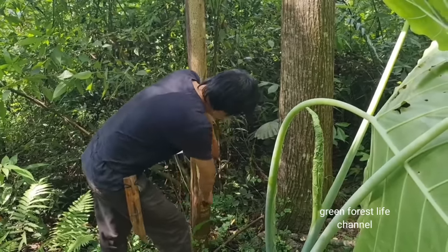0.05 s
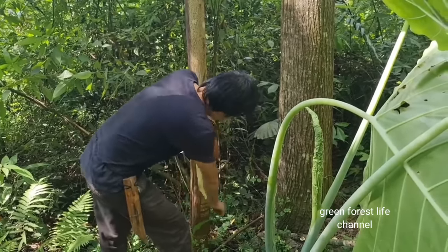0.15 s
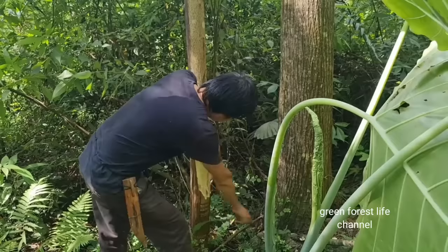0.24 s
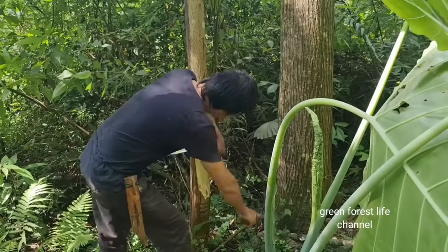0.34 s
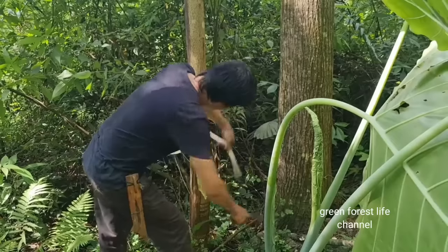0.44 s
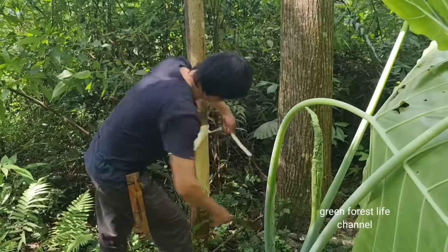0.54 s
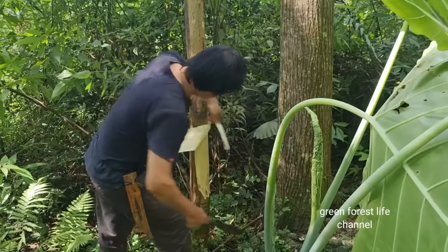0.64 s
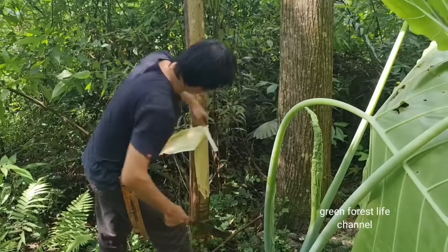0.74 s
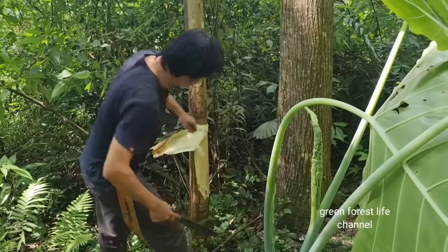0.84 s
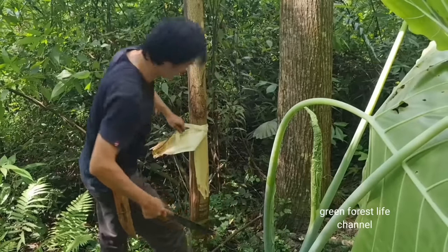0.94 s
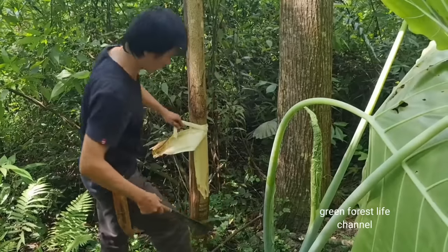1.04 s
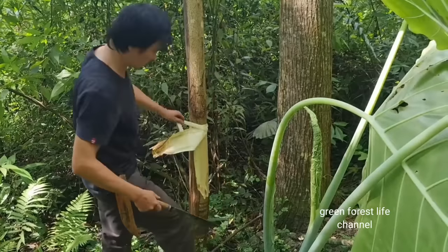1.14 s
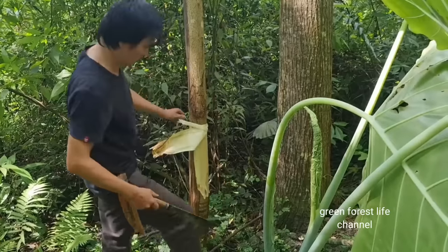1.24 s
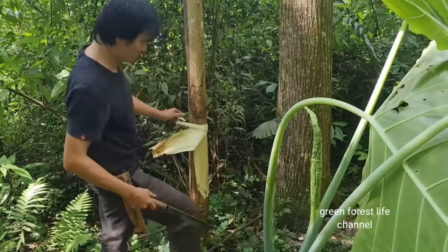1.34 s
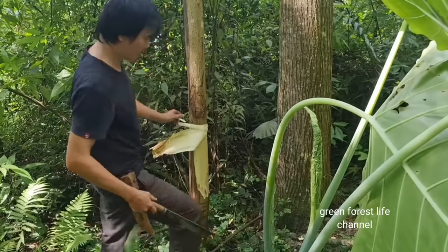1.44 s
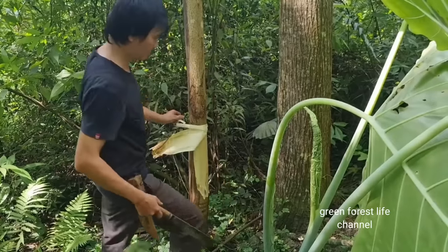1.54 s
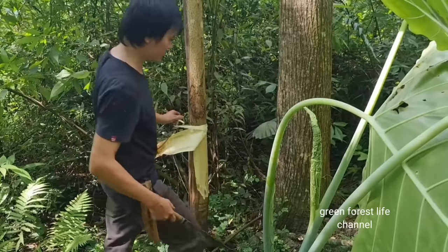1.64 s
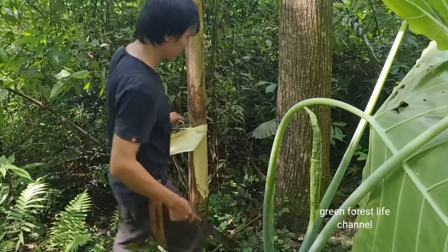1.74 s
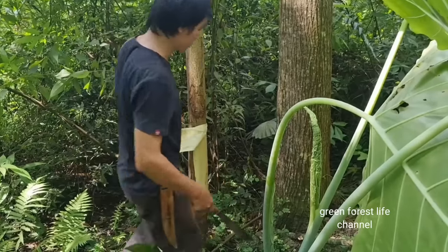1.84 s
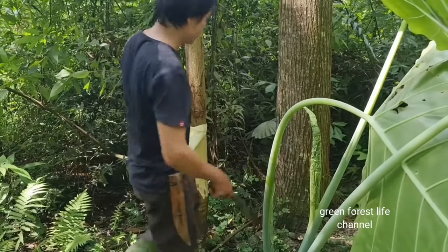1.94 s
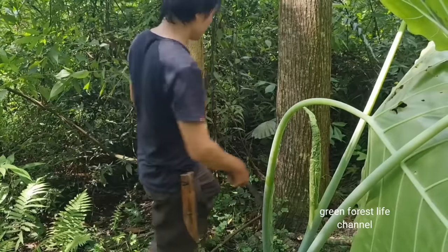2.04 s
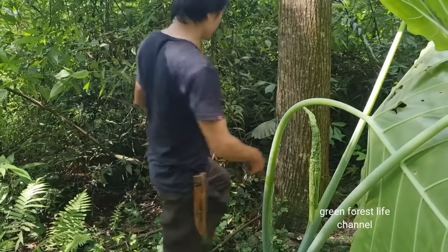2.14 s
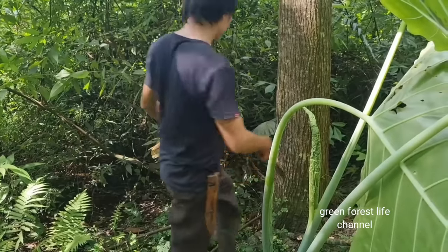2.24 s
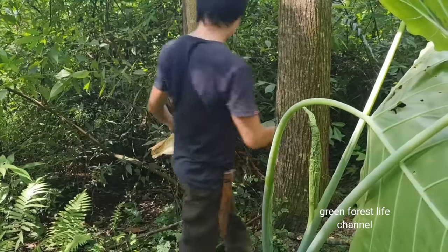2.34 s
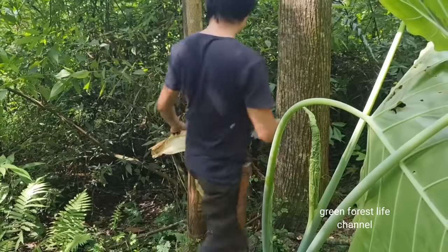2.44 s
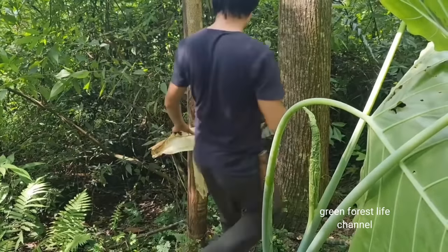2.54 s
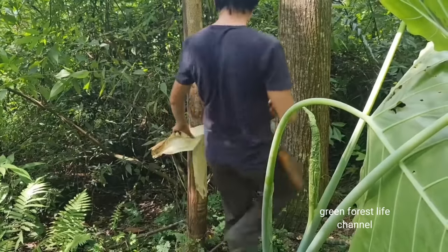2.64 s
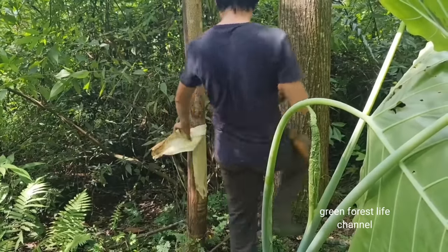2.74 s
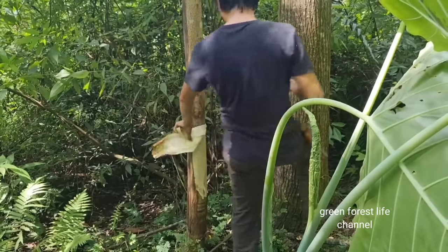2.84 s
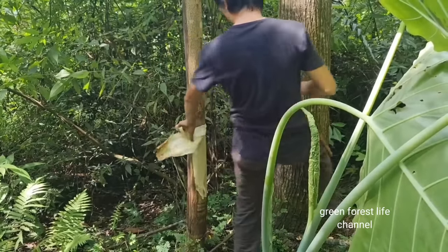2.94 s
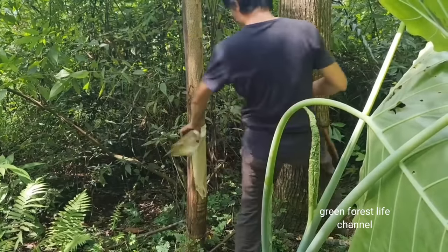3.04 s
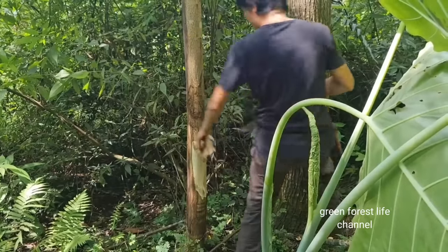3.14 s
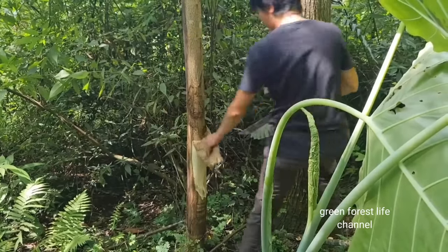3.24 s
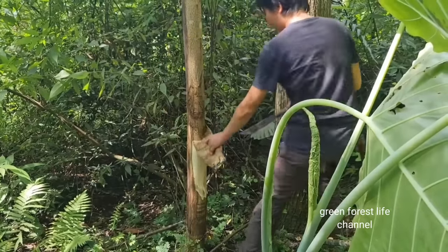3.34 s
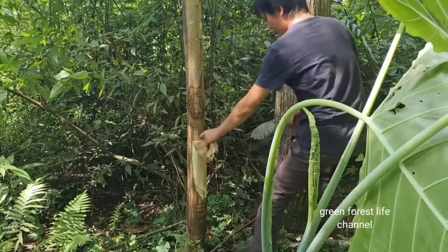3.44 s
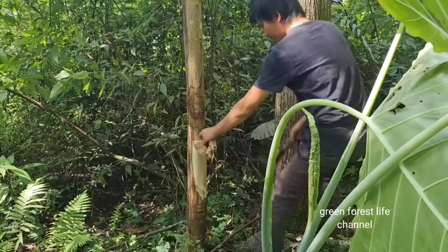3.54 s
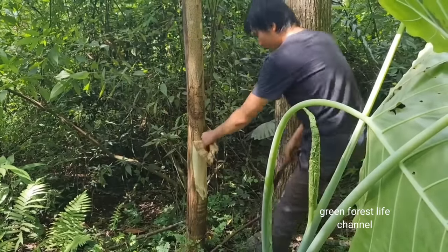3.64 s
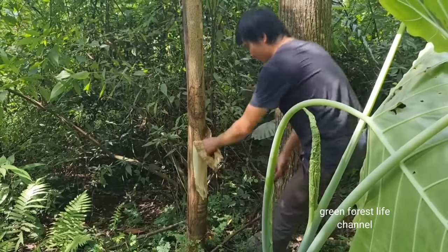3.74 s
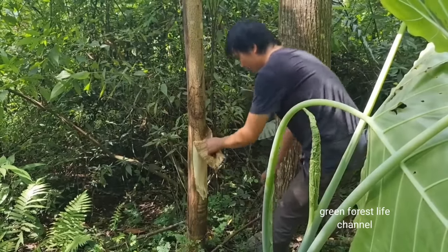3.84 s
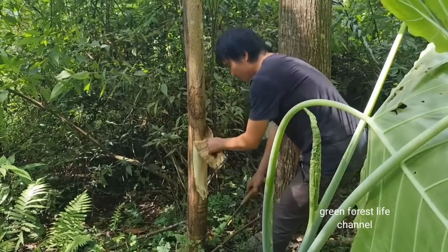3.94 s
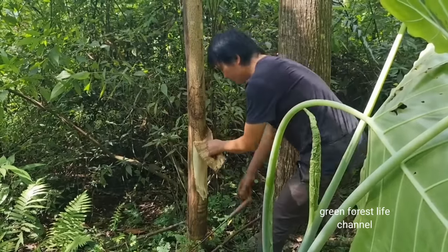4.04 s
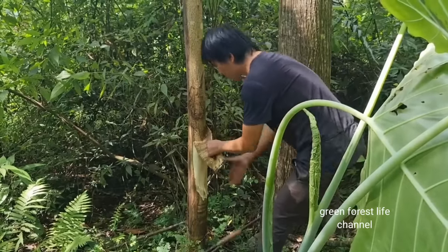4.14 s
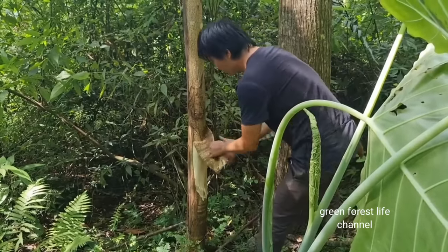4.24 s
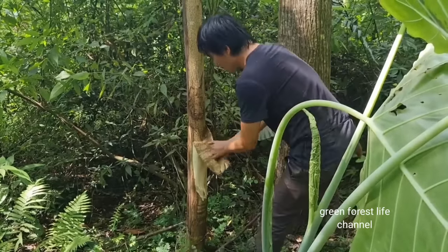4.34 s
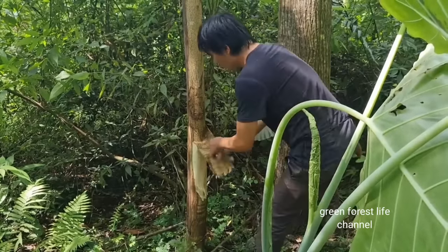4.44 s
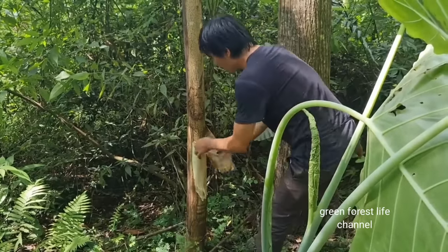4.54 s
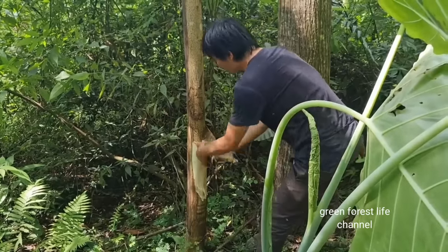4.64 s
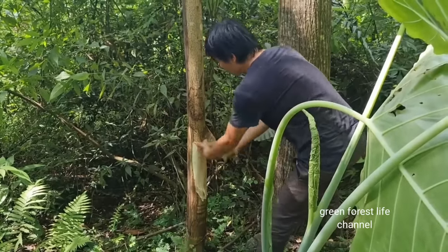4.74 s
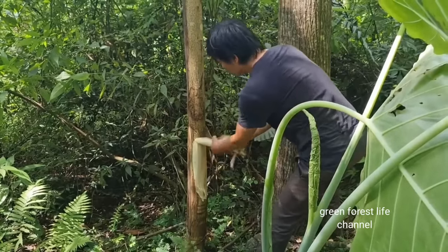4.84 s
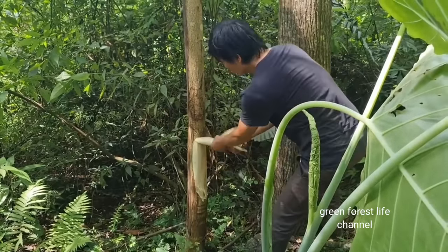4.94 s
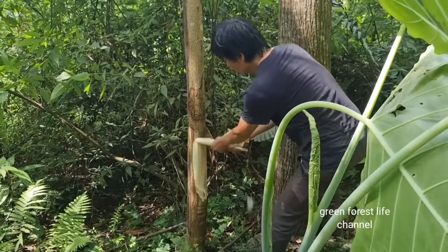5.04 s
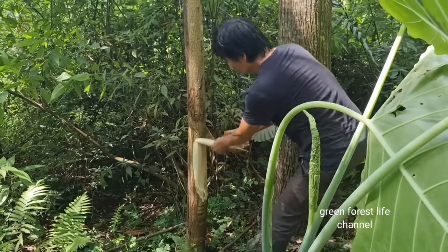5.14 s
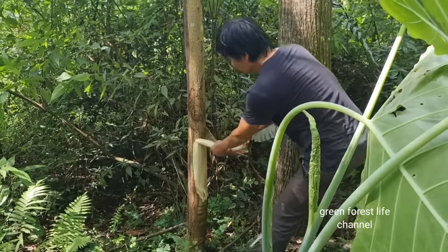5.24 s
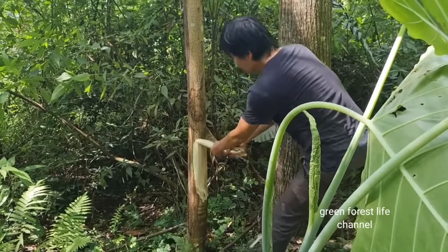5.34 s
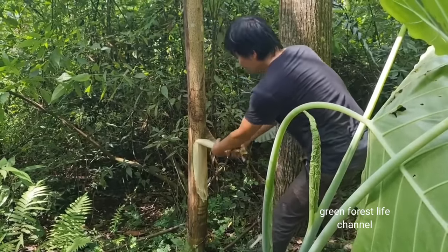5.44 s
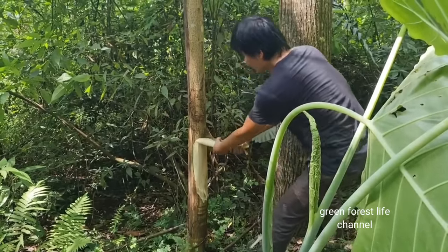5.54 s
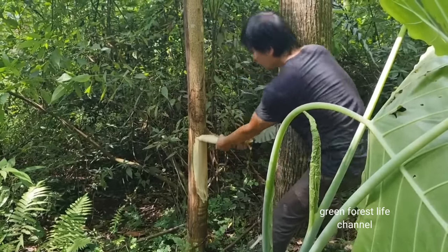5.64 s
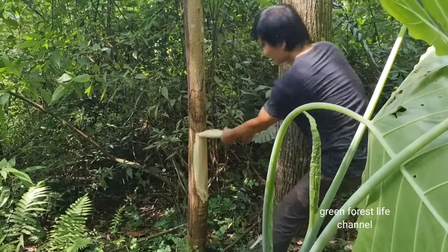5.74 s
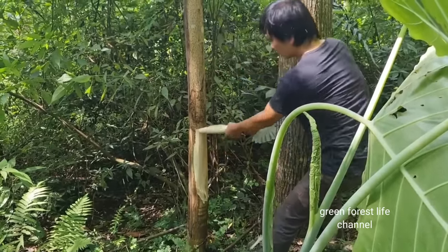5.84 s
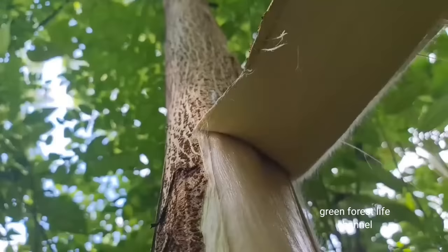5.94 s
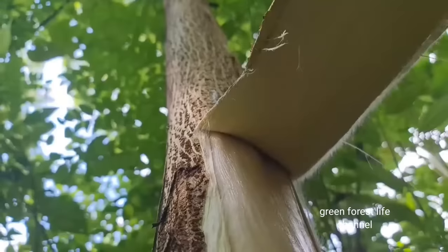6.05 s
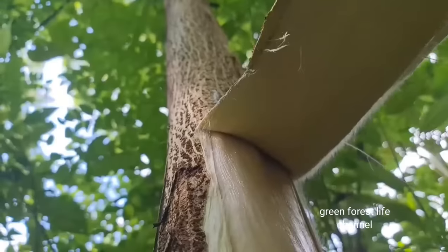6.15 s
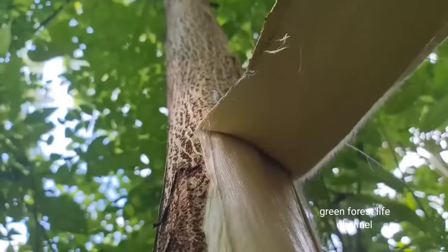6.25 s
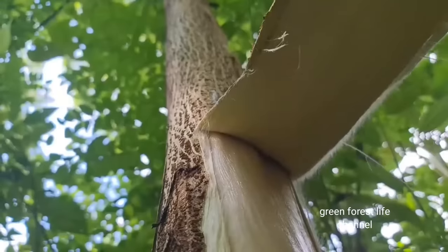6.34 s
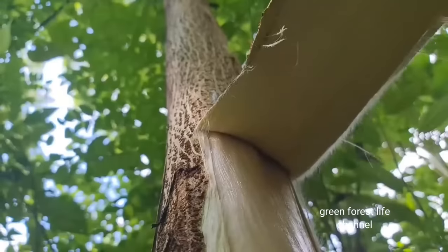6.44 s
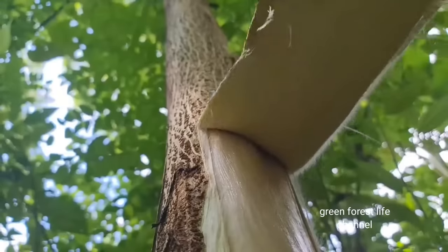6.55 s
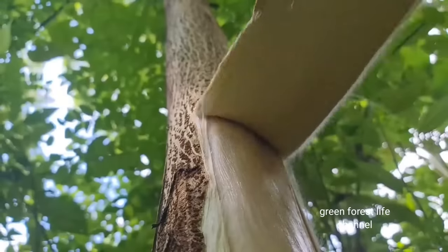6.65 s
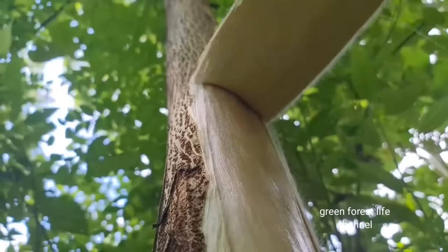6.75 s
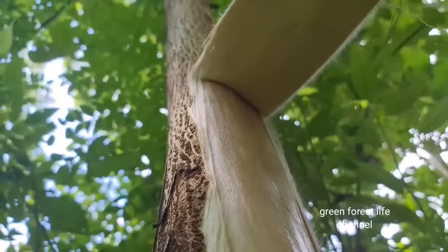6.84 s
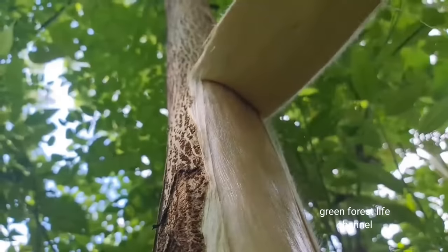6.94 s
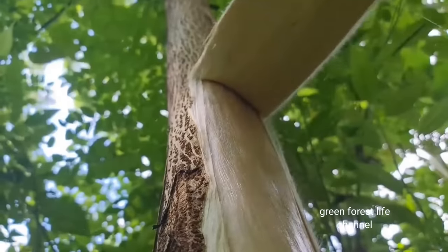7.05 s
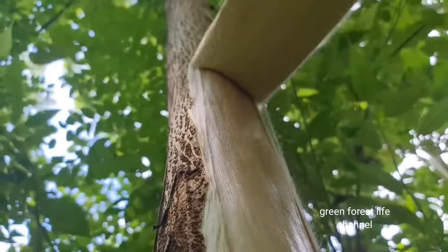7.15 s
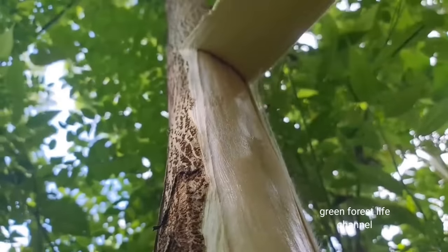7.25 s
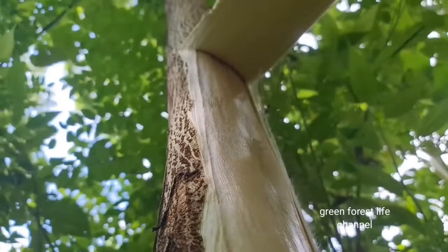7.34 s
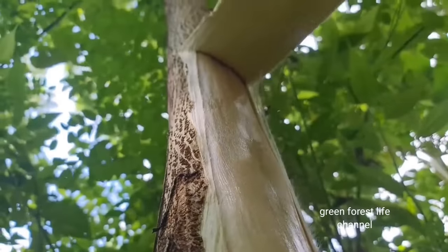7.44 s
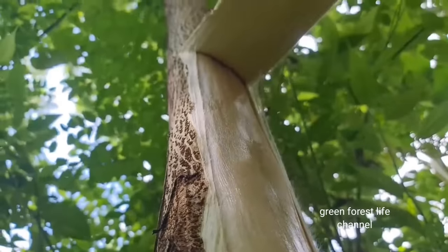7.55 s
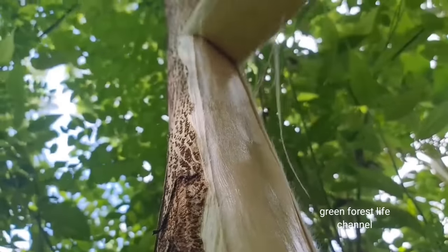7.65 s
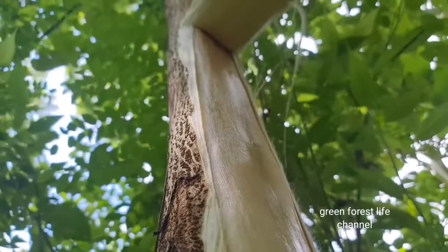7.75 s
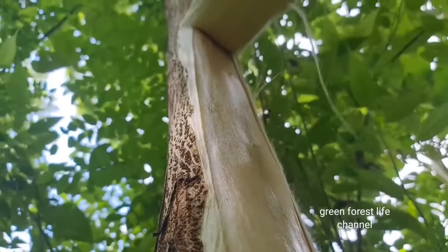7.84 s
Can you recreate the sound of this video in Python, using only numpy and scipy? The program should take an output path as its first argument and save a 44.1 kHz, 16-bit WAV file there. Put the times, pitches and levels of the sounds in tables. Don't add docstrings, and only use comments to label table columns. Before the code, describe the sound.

Sharp bark cracks and a blade knock on a trunk, leaf-litter footsteps, then long wet ripping pulls of bark in a quiet insect-filled forest.

```python
import sys
import numpy as np
from scipy import signal
from scipy.io import wavfile
from scipy.ndimage import uniform_filter1d

SR = 44100
rng = np.random.default_rng(int(sys.argv[2]) if len(sys.argv) > 2 else 0)


def inscribe(sig):
    pcm = np.round(np.clip(np.atleast_2d(sig).T, -1, 1) * 32767)
    wavfile.write(sys.argv[1], SR, pcm.astype(np.int16))


def linear_from_db(decibels):
    return 10 ** (np.asarray(decibels, float) / 20)


N = 347508

# (frequency [Hz], density [dB per Hz])
FOREST_SPECTRUM = [(110, -29.5), (180, -7), (620, -1.5), (2100, -8.5), (4200, -13.5), (8700, -15),
                   (9300, -24), (15500, -21)]
# (time [s], level [dB])
FOREST_LEVEL = [(0, -64.5), (.3, -75.5), (.6, -75), (1.3, -72), (2.5, -65.5), (4.2, -68), (4.7, -73.5),
                (5.6, -72), (6.2, -67), (7.88, -67)]
# (frequency [Hz], left-right likeness [-1..1])
FOREST_LIKENESS = [(60, 0.68), (240, -0.8), (950, -0.58), (3770, 0.0075), (15000, -0.23)]
# (centre [Hz], half width [Hz], level [dB rms])
INSECTS = [
    (4950, 300, -61.5),
    (8300, 200, -79),
]
# (frequency [Hz], density [dB per Hz])
RUMBLE_SPECTRUM = [(12, -59.5), (20, -30), (32, -18.5), (54, 5), (72, 6), (96, -5), (140, -8), (180, -35.5)]
# (time [s], level [dB])
RUMBLE_LEVEL = [(0, -62.5), (.26, -56.5), (.37, -69.5), (1.68, -62.5), (1.8, -47), (1.9, -63), (2.2, -58),
                (2.85, -55), (3.15, -55.5), (4.04, -52), (4.85, -63), (6.08, -59.5), (6.3, -53),
                (6.87, -46), (7.03, -50), (7.28, -46.5), (7.7, -49), (7.88, -64)]

# (frequency [Hz], density [dB per Hz])
LITTER_SPECTRUM = [(88, -30.5), (190, 9), (396, 12), (844, -3), (1370, -5), (2230, -9.5), (2980, -7.5),
                   (5870, -9.5), (15500, -18.5)]
# (frequency [Hz], left-right likeness [-1..1])
LITTER_LIKENESS = [(300, 0.94), (1500, 0.13), (9000, 0.088)]
# (time [s], level [dB])
STIRRING = [(0, -56.5), (.3, -74), (.46, -67.5), (.7, -68.5), (1.3, -65), (1.58, -56), (2.24, -60.5),
            (2.6, -60), (3.0, -69), (3.45, -51), (4.1, -57), (4.24, -59.5), (4.61, -66.5), (4.89, -63),
            (5.48, -64), (6.1, -69), (6.9, -56), (7.88, -66)]
# (middle [s], level [dB rms], rise [s], fall [s], treble [dB])
CRUNCHES = [(0.375, -53.5, 0.0086, 0.015, 6), (1.42, -52, 0.07, 0.045, -10.5),
            (1.749, -36.5, 0.021, 0.013, -12), (1.81, -48.5, 0.041, 0.019, -6.5),
            (2.23, -50.5, 0.013, 0.073, -18.5), (2.38, -35.5, 0.011, 0.026, -13),
            (2.46, -35.5, 0.026, 0.028, -7), (2.63, -48.5, 0.052, 0.03, -8.5),
            (3.179, -36.5, 0.0067, 0.022, -7.5), (3.373, -41.5, 0.0092, 0.02, -2.5),
            (3.61, -47, 0.026, 0.054, -10), (3.783, -40, 0.008, 0.022, -3), (3.762, -46, .015, .02, -9),
            (4.38, -67.5, .01, 0.061, -1.5), (3.95, -55, .004, 0.012, 5),
            (4.034, -47.5, 0.011, 0.033, -6.5), (5.121, -55, 0.0074, 0.043, -15),
            (6.31, -45.5, 0.059, 0.047, -7), (6.389, -52, 0.015, 0.004, 1), (6.97, -57, .06, .2, 1),
            (7.44, -53, .05, .2, -1), (7.58, -50, .07, .05, 0)]
# (middle [s], level [dB rms], rise [s], fall [s], bass [dB])
SHAKES = [
    (.215, -35, 0.064, 0.027, -19.5),
    (.14, -50, .07, .05, -22.5),
    (.385, -43, 0.017, 0.018, -32.5),
    (2.47, -58, 0.27, 0.015, -1.5),
    (3.18, -64, 0.14, 0.046, 5),
    (4.37, -34, 0.033, 0.043, -15),
    (5.75, -58, 0.097, .06, -13),
    (6.38, -51, 0.11, 0.52, -8.5),
    (7.57, -42.5, 0.13, 0.088, -7.5),
]

# (start [s], length [s], pitch [Hz], level [dB rms])
CREAKS = [(.085, .06, 2700, -53), (.22, .08, 2700, -49), (.29, .06, 2750, -58), (.62, .06, 2100, -68),
          (4.05, .25, 490, -59), (4.2, .12, 635, -62), (3.58, .07, 740, -51), (6.3, .1, 1450, -51),
          (6.37, .08, 1900, -52), (6.43, .08, 1500, -51), (6.4, .1, 1150, -54), (6.0, .08, 880, -49),
          (7.07, .05, 370, -51), (3.57, .09, 320, -51), (5.095, .05, 900, -56), (7.53, .08, 330, -48),
          (7.73, .07, 290, -47)]
# (time [s], peak [dB], ring [Hz], treble [dB], crack length [s])
CRACKS = [(.1452, -19, 2500, -34, .016), (.1445, -23, 4000, -34, .012), (.1533, -20, 1600, -32, .012),
          (.1682, -9, 2700, -34, .014), (.1678, -16, 5200, -36, .012), (.1685, -13, 1500, -40, .014),
          (.175, -22, 2800, -30, .03), (.2185, -19, 1900, -40, .012), (.236, -26, 2700, -28, .015),
          (.2113, -6, 1750, -40, .022), (.2101, -1, 4400, -32, .016), (.2101, -9, 5800, -38, .012),
          (.215, -18, 5000, -34, .06), (.2112, -11, 2700, -40, .025), (.2115, -15, 1300, -45, .014),
          (2.293, -27, 1700, -38, .016), (2.2945, -25, 800, -45, .022), (4.329, -9, 1200, -42, .012),
          (4.329, -12, 2200, -30, .008), (4.33, -25, 3300, -26, .06), (4.3315, -9, 1800, -44, .008),
          (4.3335, -11, 1500, -44, .01), (4.336, -17, 1400, -38, .03), (4.347, -20, 1500, -30, .04),
          (4.3625, -2, 3100, -38, .03), (4.3585, -18, 2600, -28, .03), (4.3585, -24, 11500, -40, .07),
          (4.359, -17, 5500, -28, .03), (4.349, -24, 3600, -26, .04), (4.362, -24, 12000, -40, .05),
          (4.342, -38, 11000, -40, .1), (4.345, -36, 15000, -50, .15), (4.372, -28, 3200, -60, .36),
          (4.372, -15, 3000, -40, .02), (4.368, -19, 5200, -45, .07), (4.331, -29, 6000, -26, .14),
          (4.362, -12, 850, -45, .03), (4.363, -9, 5300, -45, .03), (4.369, -11, 1900, -45, .025),
          (4.59, -42, 1050, -40, .03)]
# (time [s], peak [dB], ring [Hz], left-right [dB])
BRITTLE = [(.1535, -27, 2800, 0), (.146, -26, 1500, 0), (1.541, -33.5, 5540, 6), (1.74, -39, 3820, 8),
           (2.442, -27, 1400, 0), (2.4503, -18, 3600, 3), (2.488, -16.5, 3050, 1), (2.4885, -22, 6500, 2.5),
           (2.4965, -17, 4500, -0.5), (2.511, -30, 3980, 0), (3.369, -33, 5470, 4),
           (3.369, -32.5, 2370, 5.5), (3.587, -29, 3200, 1), (3.777, -25, 7800, 1), (3.946, -40.5, 3005, 2),
           (3.9545, -30, 3950, 2), (3.8805, -42, 5160, 0.5), (3.9074, -41, 2300, 0.5),
           (6.297, -34, 3220, -6), (2.566, -45, 2940, 0.5), (.372, -36, 4500, 0), (4.032, -23, 5600, 0),
           (4.151, -39.5, 5040, 5), (5.752, -30.5, 1900, 4), (5.989, -27.5, 1610, 2),
           (6.313, -25, 3600, -5), (4.08, -39.5, 7000, 2)]
# (time [s], peak [dB], ring [Hz], left-right [dB])
DAMP = [(.359, -36.5, 2640, -0.5), (0.364, -28, 2520, -1), (.367, -29.5, 1720, -2), (.369, -30, 3270, 2),
        (.379, -36, 2400, 2), (1.439, -40, 3500, 5.5), (1.821, -30, 4440, 1), (2.292, -21, 1050, -1),
        (2.38, -24, 1130, 0.5), (3.053, -42, 950, -1), (3.090, -35, 1320, -6), (3.096, -31, 900, -1),
        (3.100, -32, 1120, 3.5), (3.116, -37, 990, -6), (3.165, -32.5, 990, -6), (3.173, -26, 1100, -4),
        (3.184, -32, 900, -4), (3.091, -36, 1900, 0), (3.176, -33, 600, -5), (3.174, -32, 1700, -3),
        (3.097, -41, 600, 0), (3.210, -30.5, 850, -12), (3.243, -43, 1010, 1.5), (3.291, -42, 1080, 0),
        (3.669, -42, 1430, -0.5), (3.746, -41, 1430, 1), (2.264, -44, 1260, 2), (2.223, -43, 990, 3),
        (2.592, -42, 740, 1), (3.006, -46, 1060, 0), (2.473, -33, 1500, 0), (2.372, -33, 1000, 0),
        (6.35, -40, 1500, -3), (6.4, -40, 1800, -3), (2.806, -47.5, 325, -15.5), (5.94, -42, 1390, 0),
        (4.588, -34.5, 2480, 13), (5.105, -38.5, 2980, -3), (1.57, -42, 800, 4), (5.16, -34.5, 2840, -4),
        (5.165, -39.5, 1400, -2), (4.112, -51, 1200, 0.5), (6.43, -42, 1500, 0), (6.47, -37, 1200, -4),
        (1.42, -41, 1000, 2), (4.89, -47, 1570, 5.5)]
# (time [s], peak [dB], ring [Hz], left-right [dB])
SLIPS = [(6.5096, -30, 6230, -2.5), (6.511, -38, 12000, -2), (6.526, -33, 5830, -1),
         (6.537, -19, 6140, 0.5), (6.542, -22.5, 5760, -4), (6.5545, -20.5, 6100, -3.5),
         (6.563, -19, 5810, -3), (6.5674, -17, 5910, 1.5), (6.5756, -18, 5760, -3.5),
         (6.5895, -38, 6630, -2), (6.5884, -22, 6390, -3.5), (6.6114, -38, 5740, 5),
         (6.6404, -27, 6150, -2), (6.6664, -10.5, 6300, 1), (6.7008, -20, 5840, 2), (6.7512, -7, 5590, 3.5),
         (7.0888, -39, 4240, 0.5), (7.1129, -45, 7050, 0), (7.137, -26, 6900, 2), (7.147, -20, 7080, 2),
         (7.1754, -16.5, 6810, 2.0), (7.3854, -34.5, 8700, 0.5), (7.5474, -29, 4240, -3),
         (7.552, -31, 5500, 0), (7.6311, -22, 5420, 1), (7.64, -19, 5810, 1), (7.6974, -8, 6000, 4.5),
         (7.7264, -12.5, 4480, 2.5)]

# (time [s], pitch [Hz], level [dB], t60 [s])
EDGE_RINGS = [
    (.2105, 14100, -35, .2),
    (.2105, 14160, -44, .25),
    (.212, 1760, -19, .05),
]
# (time [s], peak [dB], pitch [Hz], t60 [s])
THUMPS = [
    (0.211, -27, 332, 0.033),
    (4.329, -23, 223, 0.041),
    (2.465, -34.5, 130, 0.086),
    (3.18, -22.5, 131, 0.083),
    (3.754, -39.5, 194, 0.049),
    (4.333, -23, 400, 0.12),
    (4.361, -13.5, 390, 0.046),
]
# (frequency [Hz], level [dB], t60 [s])
BLADE_MODES = [(689, -8, .12), (1206, -14, .25), (1459, -6, .14), (1825, -3, .2), (2030, -14, .17),
               (2239, -10, .17), (2490, -15, .36), (2821, 2, .16), (3090, 0, .11), (3880, -12, .25),
               (4716, -9, .11), (5712, -19, .2), (5997, -12, .11), (3200, -17, .3)]
# (frequency [Hz], level [dB], t60 [s])
TOUCH_MODES = [(2046, -16, 0.15), (2283, -15, 0.12), (2503, -8, 0.18), (3101, 0, 0.1), (3171, -9, 0.13)]
# (time [s], level [dB], longest t60 [s])
BLADE_HITS = [
    (4.364, -20.5, .45),
    (4.59, -37.5, .19),
]
# (time [s], pitch [Hz], level [dB], t60 [s], gripped after [s], grip time [s])
HANDLE = (4.366, 356, -33, .6, .12, .007)

# (time [s], force [dB], tightness of curl [0..1])
PULLS = [
    [(5.7, -60, .1), (5.76, -48, 0), (5.894, -48, 0.7), (6.04, -34.5, 0.4), (6.075, -46, 0.9),
     (6.12, -66, .35)],
    [(6.5, -58, 0.6), (6.54, -40, 1), (6.594, -28, .9), (6.634, -28.5, 0.7), (6.742, -17.5, 0.65),
     (6.776, -16, .1), (6.856, -19.5, 0.2), (6.884, -31, 0.3), (6.915, -56, 0.47)],
    [(7.07, -52, .1), (7.126, -43, .3), (7.142, -30.5, .5), (7.18, -19.5, 0.5), (7.225, -14.3, 0.42),
     (7.31, -17, 0.4), (7.354, -28.5, 0.89), (7.368, -41, 0.45), (7.45, -56, 0.4)],
    [(7.51, -47.5, 0.2), (7.618, -37, .15), (7.644, -22, 1), (7.67, -14, 0.5), (7.699, -15.5, 0.6),
     (7.702, -20.5, 0.4), (7.79, -22.5, 0.4), (7.83, -35, 0.9), (7.855, -60, .35)],
]
# (frequency [Hz], width [Hz], share)
CURLS = [
    [(6000, 620, 0.99), (4430, 190, 0.17), (1500, 500, 0.1)],
    [(6130, 970, 2.4), (4400, 160, 0.11), (1200, 450, 1.0)],
    [(6600, 710, 2), (4400, 300, 1.3), (1900, 680, -1)],
    [(6000, 1000, 1.7), (4500, 500, .6), (11000, 4000, -0.61)],
]
# (frequency [Hz], density [dB per Hz])
TEAR_SPECTRUM = [(120, -67), (200, -62), (278, -10.5), (462, -33), (702, -10), (923, -12), (1210, -6.5),
                 (1710, -8), (2060, -12.5), (3000, -9.5), (4200, -10.5), (6020, -8.5), (7620, -10),
                 (12700, -4.5), (15500, -8)]
# (frequency [Hz], left-right likeness [-1..1])
TEAR_LIKENESS = [(60, 0.72), (180, 0.58), (550, 0.18), (1650, 0.77), (4970, 0.15), (15000, 0.0077)]
# (frequency [Hz], left lead [rad])
TEAR_PHASE = [(1, -0.66)]

# (frequency [Hz], t60 [s])
TRUNKS_T60 = [(200, 0.28), (1000, 0.19), (4000, 0.12), (12000, 0.11)]

SNAP_LEAD_S = .008


def evened(x):
    return x / np.sqrt(np.mean(x ** 2) + 1e-20)


def read(points, hz):
    f, value = np.transpose(points)
    return np.interp(np.log(hz + 1), np.log(f + 1), value)


def curves(rows, t):
    s, *columns = np.transpose(rows)
    return [np.interp(t, s, c) for c in columns]


def add(mix, s, sound):
    part = mix[..., round(s * SR):][..., :sound.shape[-1]]
    part += sound[..., :part.shape[-1]]


def band(x, lo_hz, hi_hz):
    sos = signal.butter(2, [lo_hz, min(hi_hz, .45 * SR)], "band", fs=SR, output="sos")
    return signal.sosfilt(sos, x)


def crackle(per_s, spread_db, hiss):
    size = linear_from_db(spread_db * np.minimum(rng.exponential(1, (2, N)), 4.))
    clicks = size * (rng.random((2, N)) < per_s / SR) * rng.choice([-1., 1.], (2, N))
    return evened(clicks) + hiss * rng.standard_normal((2, N))


def paired(streams, colour_db, likeness, phase, size):
    hz, t, (a, b) = signal.stft(streams, SR, nperseg=size)
    like = np.clip(read(likeness, hz), -1, 1)[:, None]
    right = like * a + np.sqrt(1 - like ** 2) * b
    right = right * np.exp(-1j * read(phase, hz))[:, None]
    coloured = np.array([a, right]) * linear_from_db(colour_db(hz[:, None], t))
    return signal.istft(coloured, SR, nperseg=size)[1][:, :N]


def unit(spectrum, hz, lo_hz, hi_hz):
    level_db = read(spectrum, hz)
    inside = (hz > lo_hz) * (hz < hi_hz)
    return level_db - 10 * np.log10(np.mean(linear_from_db(2 * level_db) * inside))


def patches(hz, t, wide, long):
    field = rng.standard_normal((len(t), len(hz)))
    field = uniform_filter1d(field, max(int(long), 1), 0)
    return evened(uniform_filter1d(field, max(int(wide), 1), 1)).T


def three_way(spectrum, hz, mid_hz, bass_db, mid_db, treble_db):
    low = 1 / (1 + (hz / mid_hz[0]) ** 4)
    high = 1 / (1 + (mid_hz[1] / (hz + 1)) ** 8)
    bass = unit(spectrum, hz, 200, mid_hz[0]) + bass_db
    mid = unit(spectrum, hz, *mid_hz) + mid_db
    treble = unit(spectrum, hz, 9000, 15000) + treble_db
    return low * bass + (1 - low - high) * mid + high * treble


def swells(rows, t):
    s, db, rise, fall, share_db = np.transpose(rows)[:, :, None]
    sharpness = np.where(t < s, 2, 1.17)
    swell = np.exp(-abs((t - s) / np.where(t < s, rise, fall)) ** sharpness) * linear_from_db(2 * db)
    return swell.sum(0), (swell * linear_from_db(2 * share_db)).sum(0)


def pulling(t):
    return [(t > pull[0][0]) & (t < pull[-1][0]) for pull in PULLS]


def strip_force(t):
    force_db, tight = curves(np.vstack(PULLS), t)
    return force_db - 80 * ~np.any(pulling(t), 0), tight


def ringing(hz, db, t60, rise, sag=0):
    t = np.arange(SR // 2) / SR
    pitch_hz = hz * (1 + sag * linear_from_db(-60 * t / t60) * (hz < 250))
    turns = np.cumsum(pitch_hz) / SR + rng.random()
    return linear_from_db(db - 60 * t / t60) * np.sin(2 * np.pi * turns) * (1 - np.exp(-t / rise))


def forest():
    still_db, insects_follow = -72.5, 0.39

    def colour(hz, t):
        air_db = curves(FOREST_LEVEL, t)[0]
        leaves = linear_from_db(2 * (unit(FOREST_SPECTRUM, hz, 5800, 7280) + air_db))
        chorus = sum(linear_from_db(2 * db) * SR / (4 * w) / (1 + ((hz - f) / w) ** 6) for f, w, db in INSECTS)
        spots = patches(hz, t, 5.6, 26)
        chorus = chorus * linear_from_db(2 * (insects_follow * (air_db - still_db) + 0.8 * spots))
        return 10 * np.log10(leaves * linear_from_db(2 * 2.2 * spots) + chorus)

    return paired(rng.standard_normal((2, N)), colour, FOREST_LIKENESS, [(1, 0.02)], size=1024)


def rumble():
    def colour(hz, t):
        return unit(RUMBLE_SPECTRUM, hz, 35, 100) - 60 * (hz > 125) + .7 * patches(hz, t, 30, 3)

    low = paired(rng.standard_normal((2, N)), colour, [(1, 0.84)], [(1, 0.0044)], size=4096)
    gusts_db = curves(RUMBLE_LEVEL, np.arange(N) / SR)[0]
    return low * linear_from_db(gusts_db + [[-.8], [.8]])


def rustle():
    stir_mid_db, crunch_bass_db, shake_treble_db = -54, -12, -13.5
    strip_body_db = -26

    def colour(hz, t):
        stir_db = curves(STIRRING, t)[0] - stir_mid_db
        crush, crush_treble = swells(CRUNCHES, t)
        shake, shake_bass = swells(SHAKES, t)
        bass = linear_from_db(2 * (stir_mid_db - 7 + 0.98 * stir_db))
        bass = bass + linear_from_db(2 * crunch_bass_db) * crush + shake_bass
        bass = bass + linear_from_db(2 * (strip_force(t)[0] + strip_body_db))
        mid = linear_from_db(2 * (stir_mid_db + stir_db)) + crush + shake
        treble = linear_from_db(2 * (stir_mid_db - 8 + 1.6 * stir_db))
        treble = treble + crush_treble + linear_from_db(2 * shake_treble_db) * shake
        levels_db = 10 * np.log10([bass, mid, treble])
        flicker_db = 2.4 * patches(hz, t, 70, 2) + 2.0 * patches(hz, t, 3, 6)
        return three_way(LITTER_SPECTRUM, hz, (900, 6500), *levels_db) + flicker_db - 0.5

    return paired(evened(crackle(1100, 1.8, 1.5)), colour, LITTER_LIKENESS, [(1, 0.0043)], size=256)


def creak(length, hz, db):
    width, sag = .07, .03
    t = np.arange(0, length, 1 / SR)
    a, b = rng.standard_normal((2, SR // 2))[:, :len(t)]
    r = np.exp(-np.pi * width * hz / SR)
    wobble = 0.6 + signal.lfilter([1 - r], [1, -r], a + 1j * b) / np.sqrt(1 - r)
    turns = np.cumsum(hz * (1 - sag * (t / length - .5))) / SR
    groan = evened((wobble * np.exp(2j * np.pi * turns)).real)
    return linear_from_db(db) * np.sin(np.pi * t / length) ** .5 * groan


def snap(peak_db, ring_hz, treble_db, length, pan_db):
    loose = .8
    first_break = 6.0
    t = np.arange(int(.2 * SR)) / SR - SNAP_LEAD_S
    a, b, c, gaps = rng.standard_normal((4, len(t)))
    spurts = linear_from_db(3.0 * evened(uniform_filter1d(gaps, size=30)))
    before = linear_from_db(-25 + 60 * t / .025) * signal.windows.tukey(len(t), .02)
    after_s = np.maximum(t, 0)
    after = linear_from_db(-60 * after_s / max(length, .004)) + linear_from_db(-31 - 60 * after_s / .2)
    drive = np.array([a + loose * b, a + loose * c]) * spurts * np.where(t < 0, before, after)
    drive = drive + first_break * signal.unit_impulse(len(t), round(SNAP_LEAD_S * SR))
    ring = band(drive, ring_hz / 1.35, ring_hz * 1.35)
    ring = evened(band(ring, ring_hz / 1.5, ring_hz * 1.5))
    wide = evened(band(drive, 1000, 7000))
    splinter = band(drive, 7000, 14500)
    body = ring + min(linear_from_db(treble_db + 18), 1.5) * wide
    sound = body / abs(body.mean(0)).max()
    sound = sound + linear_from_db(treble_db + 18.5) * splinter / abs(splinter).max()
    return linear_from_db(peak_db + np.array([[pan_db / 2], [-pan_db / 2]])) * sound


def snaps(near):
    for s, *row in CRACKS:
        add(near, s - SNAP_LEAD_S, snap(*row, pan_db=0))
    kinds = ((BRITTLE, -21, .017), (DAMP, -30, .022), (SLIPS, -27.5, 0.011))
    for rows, treble_db, length in kinds:
        for s, db, hz, pan_db in rows:
            add(near, s - SNAP_LEAD_S, snap(db, hz, treble_db, length, pan_db))


def trees(x):
    taps = np.zeros((2, SR // 2))
    at = np.arange(300, SR // 2 - 20, 20)
    at = at + rng.integers(0, 20, (2, len(at)))
    np.put_along_axis(taps, at, rng.choice([-1., 1.], at.shape), 1)
    hz, t, z = signal.stft(taps, SR, nperseg=256)
    decay = linear_from_db(-60 * t / read(TRUNKS_T60, hz)[:, None])
    tail = signal.istft(z * decay, SR, nperseg=256)[1]
    return signal.fftconvolve(x, tail / np.linalg.norm(tail[0]), axes=1)[:, :N]


def edge_rings(near):
    for s, *mode in EDGE_RINGS:
        add(near, s, ringing(*mode, rise=.001))


def thumps(near):
    for s, db, hz, t60 in THUMPS:
        add(near, s, ringing(hz, db, t60, rise=0.00058, sag=.35))


def beating(hz):
    twin_share, twin_gap = .55, .013
    return 1 + twin_share * np.sin(2 * np.pi * twin_gap * hz * np.arange(SR // 2) / SR)


def blade_hits(near):
    for (s, hit_db, longest), modes in zip(BLADE_HITS, (BLADE_MODES, TOUCH_MODES)):
        steel = sum(beating(hz) * ringing(hz, db, min(t60, longest), 0.0002) for hz, db, t60 in modes)
        add(near, s, linear_from_db(hit_db) * steel)


def handle(hz, db, t60, gripped, grip):
    ring = ringing(hz, db, t60, rise=0.00265)
    return ring / (1 + np.exp((np.arange(len(ring)) / SR - gripped) / grip))


def tear():
    def colour(hz, t):
        tight = strip_force(t)[1]
        hollow_db = -2 - 15 * tight
        fizz_db = -0.1 - 2 * tight
        curl = 0
        for rings, active in zip(CURLS, pulling(t)):
            curl = curl + active * sum(share * np.exp(-((hz - f) / w) ** 2) for f, w, share in rings)
        curl_db = 6 * tight * curl
        flicker_db = 1.2 * patches(hz, t, 90, 1) + 2.0 * patches(hz, t, 2, 12) + 1.4 * patches(hz, t, 8, 3)
        body_db = three_way(TEAR_SPECTRUM, hz, (2600, 8500), hollow_db, -0.58, fizz_db)
        return body_db + curl_db + flicker_db - .8

    fibres = paired(evened(crackle(6000, 1.2, .7)), colour, TEAR_LIKENESS, TEAR_PHASE, size=512)
    return fibres * linear_from_db(strip_force(np.arange(N) / SR)[0])


def scene():
    near = np.zeros((2, N))
    for s, *row in CREAKS:
        add(near, s, creak(*row))
    snaps(near)
    edge_rings(near)
    thumps(near)
    blade_hits(near)
    add(near, HANDLE[0], handle(*HANDLE[1:]))
    return near + linear_from_db(-19) * trees(near) + tear() + rustle() + forest() + rumble()


def low_pass(x):
    return signal.sosfilt(signal.butter(12, 15800, fs=SR, output="sos"), x)


def record(dry):
    lowpass = signal.firwin(511, 15760, window=("kaiser", 9), fs=SR)
    limited = signal.oaconvolve(dry, lowpass[None], "same")
    return low_pass(np.clip(limited, -1, 1))


dry = scene()
out = record(dry)
inscribe(out)
```